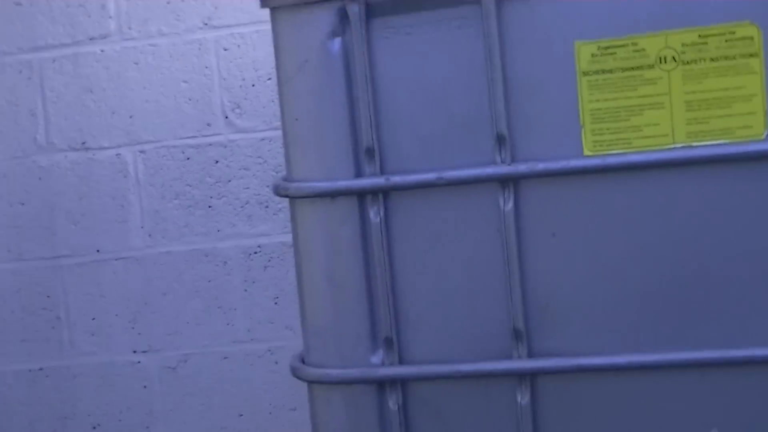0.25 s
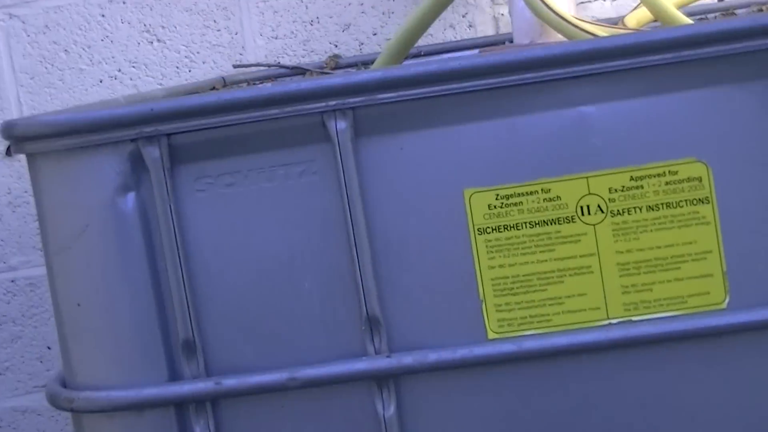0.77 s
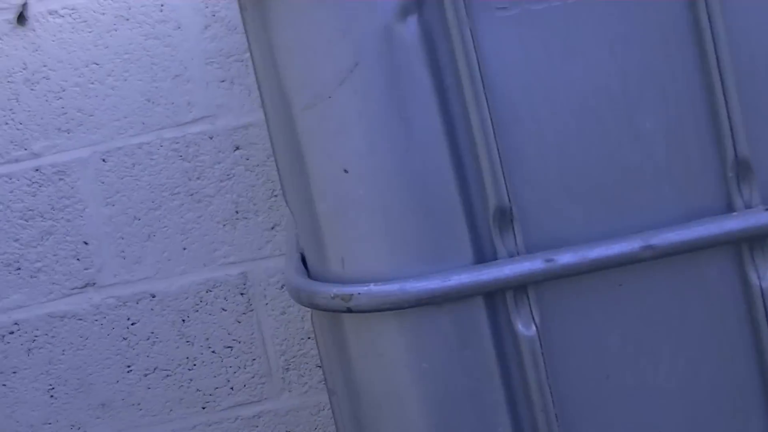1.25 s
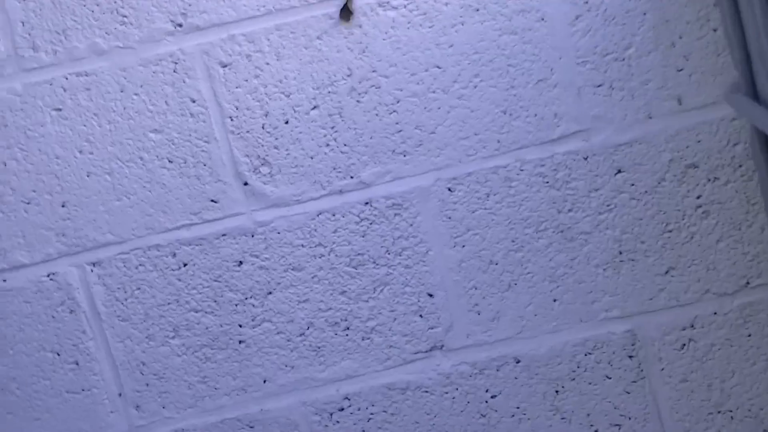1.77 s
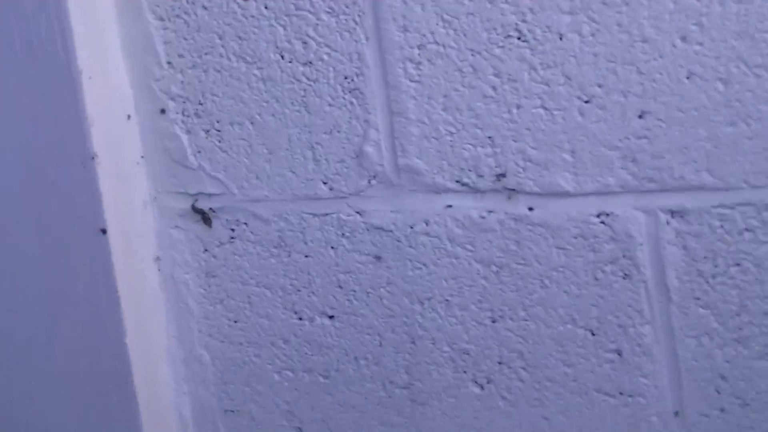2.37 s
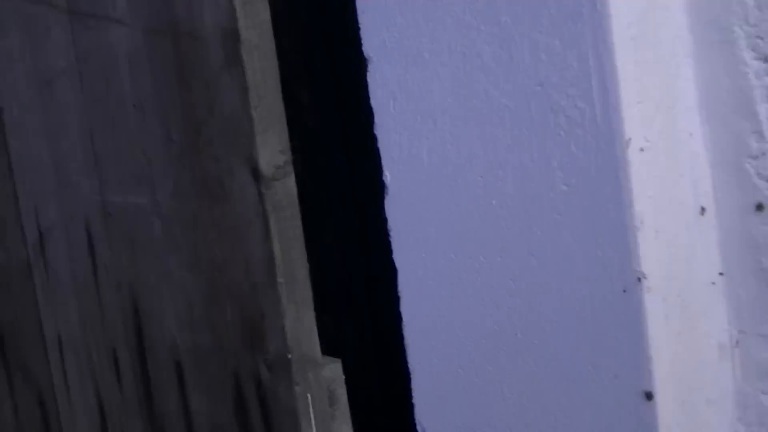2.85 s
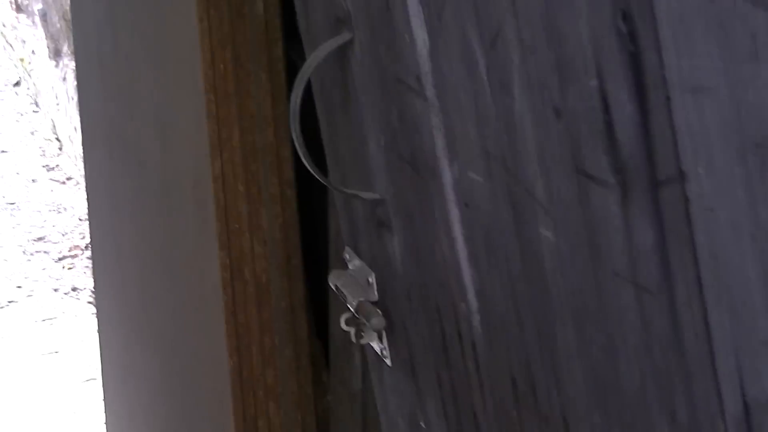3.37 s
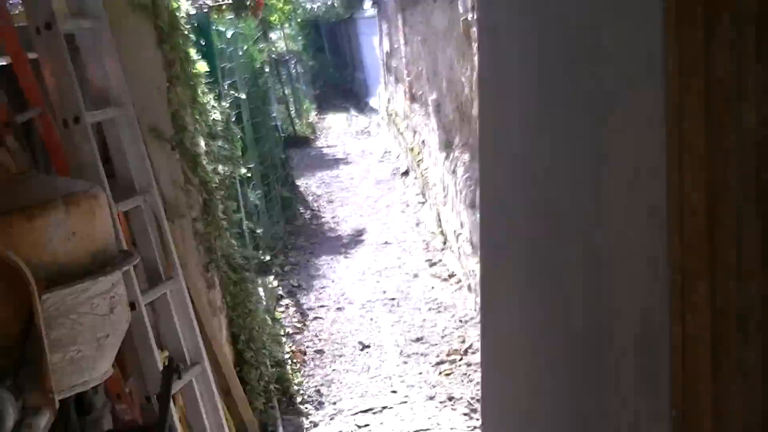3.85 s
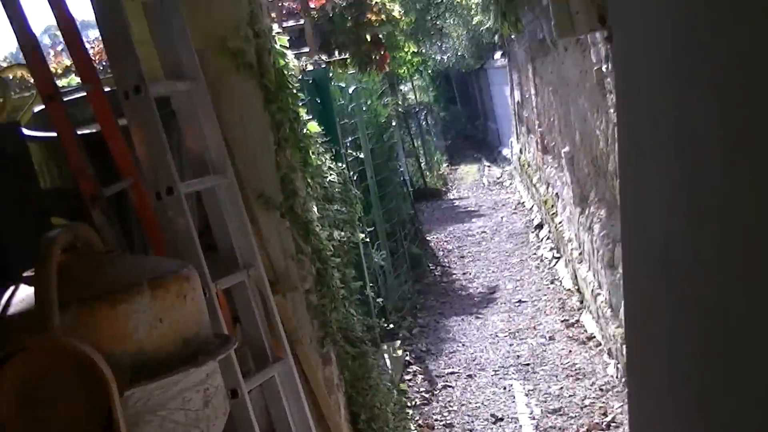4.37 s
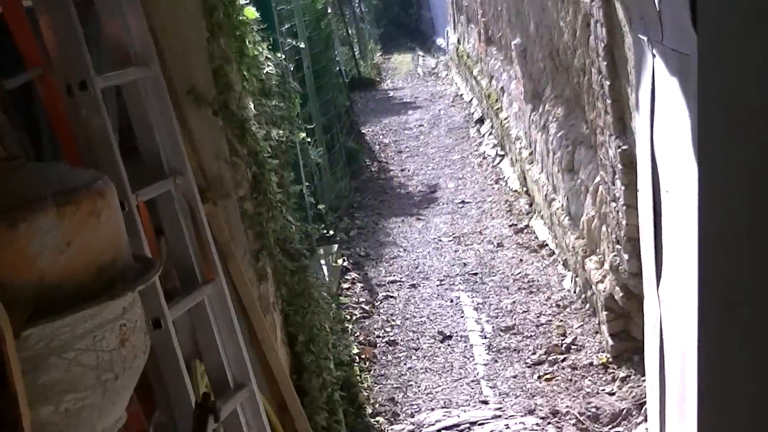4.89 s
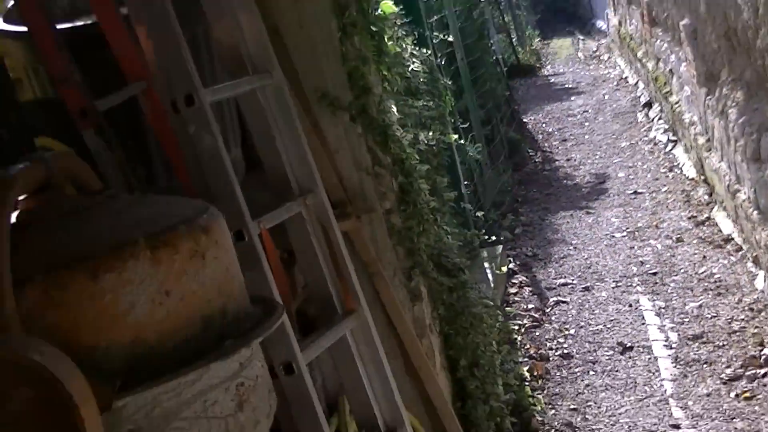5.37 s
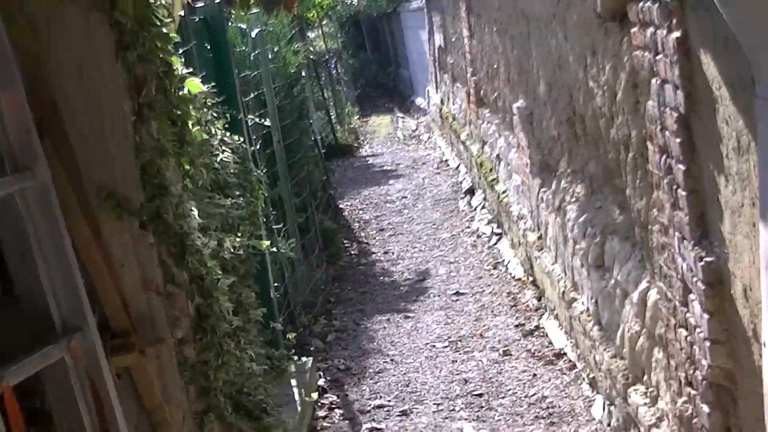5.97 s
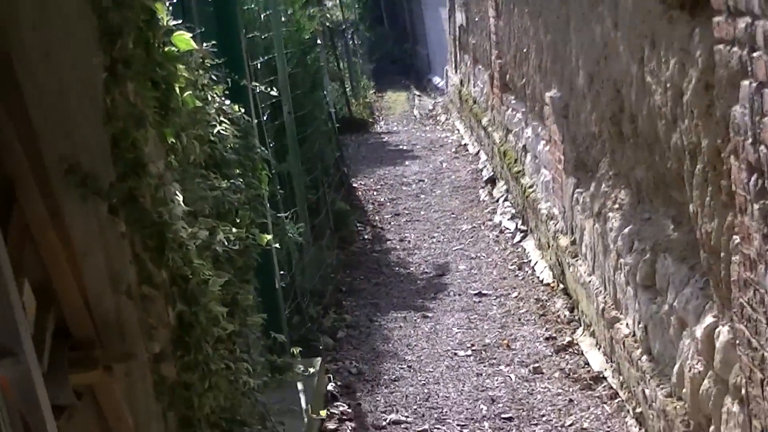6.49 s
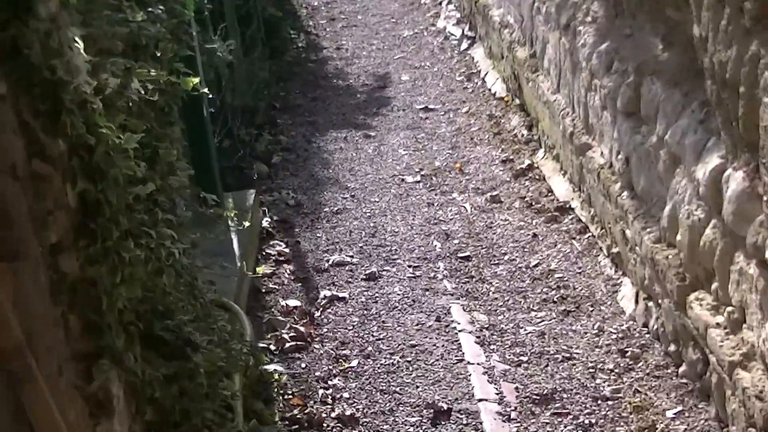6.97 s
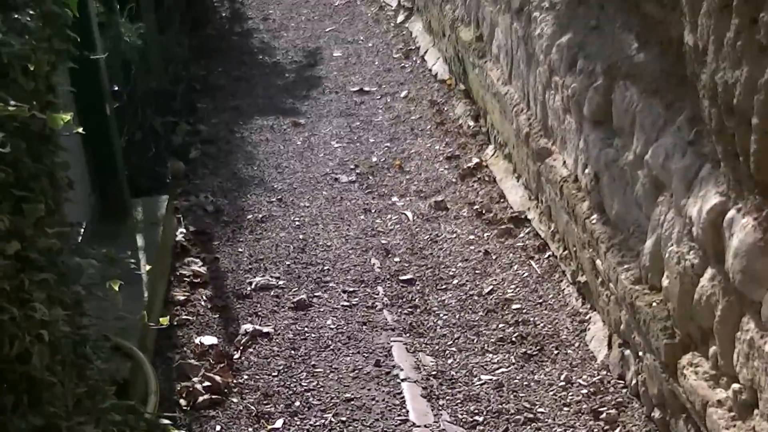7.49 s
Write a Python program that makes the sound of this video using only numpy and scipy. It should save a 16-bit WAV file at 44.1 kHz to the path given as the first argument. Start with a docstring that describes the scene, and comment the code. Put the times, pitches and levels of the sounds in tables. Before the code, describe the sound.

Soft, steady outdoor air with a very faint distant motor hum runs throughout, the hum gradually rising in pitch in the second half. At 0.1 s a step crunches on gravel, followed by light brushing scuffs until another modest, rolling step at 1.4 s. Dragging scuffs follow; bright stones snap at 2.3 s and tiny metal clinks tick around 2.4-2.7 s. A short, hard, heavy heel hit lands at 2.9 s with stones knocking. A rubbing scuff and faint clinks come near 3.4 s, then another strong, dull step at 3.9 s with a quick metallic chatter just after. At 5.0 s a longer gritty step rolls over low, hollow stones. Dull scuffs at 6.0 and 6.4 s and lighter taps lead to a crunchy step at 7.3 s with stone knocks. Grit trickles after every movement, with brief wall reflections.

```python
"""Outdoor air and a faint far motor hum, then slow footsteps on gravel in a narrow walled path, in stereo.
Each heel knocks and crunches, the ball taps and rolls, and the other foot scuffs: dense stone hits under a load.
Large stones knock as decaying notes, single stones snap as coloured clicks, and a small metal piece clinks
close by on short-lived modes. Loose grit is sparse noise, air is coloured noise, and the hum is two sines."""
import sys
import numpy as np
from scipy import signal
from scipy.fft import rfft, irfft, next_fast_len
from scipy.io import wavfile
from scipy.ndimage import uniform_filter1d

SR = 44100
rng = np.random.default_rng(int(sys.argv[2]) if len(sys.argv) > 2 else 0)


def inscribe(sig):
    """Save sig as 16-bit PCM at rate SR to the path in sys.argv[1].

    A 1-D sig is mono; a 2-D sig holds one channel per row.
    Samples are clipped to [-1, 1] before scaling.
    """
    pcm = np.round(np.clip(np.atleast_2d(sig).T, -1, 1) * 32767)
    wavfile.write(sys.argv[1], SR, pcm.astype(np.int16))


N = 341019

# Steady outdoor air, spectrum shape: frequency_hz, level_db
AIR_SPECTRUM = [(15, -77), (25, -22), (92, -13), (130, -16), (242, -9.5), (270, -6), (344, -6.5),
                (734, -5.5), (887, -4), (1400, -9.5), (1520, -6), (1740, -9.5), (2350, -12), (3520, -18),
                (12000, -27.5), (16000, -39)]
# Far motor, whose pitch dips and then climbs: time_s, pitch_hz, relative level_db
MOTOR_CURVE = [(0.0, 54, -53.5), (1.0, 55, -58), (2.5, 48, -70.5), (3.4, 52, -54.5), (4.65, 69, -50),
               (5.2, 80, -69), (5.8, 90, -59), (6.7, 99, -56), (7.73, 105, -52)]
# How well each motor order carries: frequency_hz, gain_db
MOTOR_CARRY_CURVE = [(50, -21), (65, -12.5), (90, 2.5), (118, -8.5), (135, -24), (210, -24)]
# Stereo pair, direct sound: frequency_hz, left_lead_rad
LEFT_LEAD = [(200, -6.5), (1100, 0.83), (2000, 0.1), (3200, -0.67), (5000, -4.5), (14000, 1)]
# Stereo pair, diffuse sound: frequency_hz, side_minus_mid_db
STEREO_WIDTH = [(30, 12), (70, 7.5), (160, -9.5), (700, -4.5), (1500, -1), (3000, 1.5), (6000, 1.5),
                (14000, 1)]
# Loose grit as it settles, spectrum shape: frequency_hz, level_db
SETTLING_SPECTRUM = [(800, 0.5), (2500, 7), (6000, -10.5), (11500, -2.5), (16000, -23)]
# Small metal piece clinks: start_s, relative level_db, pitch_hz, ring_gain_db
CLINK_EVENTS = [(2.4325, -36.5, 5400, -4), (2.565, -26, 5560, -11), (2.689, -36, 5450, -3),
                (3.3848, -34.5, 5600, 2.5), (3.393, -38.5, 5300, 2), (4.0547, -29, 6700, -3.5),
                (4.0644, -27, 5190, -2.5), (4.0967, -26.5, 4720, -8), (4.126, -32, 5150, -8),
                (4.428, -26.5, 6730, -19.5), (5.5095, -53, 6000, 1)]
# Modes of the metal: pitch_multiple, level_db, t60_s
METAL_MODES = [(.97, 7.5, 0.017), (1.02, -20, .008), (1.25, -16, 0.008), (1.57, -7, .01), (2.15, 0, 0.012),
               (2.45, -3, 0.0063)]
# Single stones snap: start_s, relative level_db
SNAP_EVENTS = [(0.859, -18.5), (0.874, -26), (2.2822, -14), (2.2901, -6), (2.2927, -7.5), (2.5935, -28),
               (2.621, -17.5), (2.6901, -16.5), (2.6958, -22), (3.022, -21.5), (3.815, -30.5), (3.858, -30),
               (4.0584, -17), (4.102, -20.5), (4.1582, -27.5), (4.242, -29), (6.851, -19), (7.42, -17)]
# Hard, sharp contact, spectrum shape: frequency_hz, level_db
SNAP_SPECTRUM = [(300, -75), (1000, -23.5), (2000, -11), (4000, -10), (6000, -7), (11500, -8.5),
                 (16000, -20.5)]
# Large stones tip under the shoe: start_s, relative level_db, pitch_hz
KNOCK_EVENTS = [(1.69, -31.5, 1260), (2.882, -27, 1070), (2.913, -25.5, 1050), (3.124, -33, 1230),
                (3.721, -31.5, 1900), (4.185, -33.5, 1230), (5.05, -22, 497), (5.091, -25.5, 600),
                (5.196, -24, 940), (5.354, -33, 1380), (5.98, -42, 1240), (6.41, -27.5, 1500),
                (7.42, -19.5, 1160), (7.61, -21, 1350)]
# Blunt pulse of a knock, spectrum shape: frequency_hz, level_db
KNOCK_SPECTRUM = [(30, -51), (110, 0.5), (330, 5), (1000, 16.5), (1700, 9), (3000, -7), (12000, -21)]
# Where thud, body, crunch and grit sit: frequency_hz
STROKE_BANDS_HZ = [450, 1300, 3500, 10000]
# Colour shared by all strokes on the gravel: frequency_hz, level_db
GRAVEL_SPECTRUM = [(20, -42), (50, -25), (110, -26), (200, -8), (450, 2), (800, -1.5), (1300, -1),
                   (2200, -1.2), (3500, -2.5), (6000, -1.5), (11800, 1.5), (14000, -5), (16000, -20)]
# Light touches or drags of the other foot: start_s, relative level_db, rise_s, thud_db, brightness_db
SCUFF_EVENTS = [(0.41, -45, 0.011, 1, -0.5), (0.557, -32, 0.0014, -9, -12),
                (0.852, -31.5, 0.0039, 1.5, 7.5), (0.949, -41.5, 0.0063, 5, 10.5),
                (1.074, -43, 0.021, 11.5, 6), (1.682, -34, 0.0033, 3, 4.5), (1.814, -31, 0.018, -3, -35),
                (1.964, -29.5, 0.027, 3.5, -7), (2.25, -33, 0.0044, 8, -2), (2.30, -44, 0.063, -23, 2),
                (2.449, -33.5, 0.011, -1, -7), (2.58, -26, 0.0084, -2.5, -13), (2.88, -24.5, 0.0033, 0, 0),
                (3.1, -37.5, 0.006, -23, -3), (3.456, -24.5, .038, -13, 9), (3.563, -36, 0.0017, 5.5, -3),
                (3.712, -31.5, 0.0096, -3, -11), (4.213, -44, 0.0016, -3, 7), (4.528, -37, 0.061, -9, 5),
                (4.721, -31.5, 0.026, -14, -16), (5.195, -22, 0.0019, 2, -14),
                (5.777, -40.5, 0.011, 5.5, 1.5), (5.84, -36.5, 0.014, -10, -5),
                (5.979, -21, 0.0037, -17, -19.5), (6.10, -26.5, 0.048, -7.5, -8.5),
                (6.408, -20, 0.015, -18, -27), (6.484, -36.5, 0.0025, -14, 1.5),
                (6.563, -30, 0.049, -16, -19), (6.848, -23.5, 0.0024, -10.5, 4.5),
                (6.97, -40.5, 0.035, -10, 1.5), (7.046, -28, 0.0015, 1.5, -26),
                (7.172, -26.5, 0.0026, -14, -15), (7.573, -27, 0.0022, -12, -4.5)]
# Full steps, heel then ball (levels relative): start_s, knock_db, knock_pitch_hz, heel_db, heel_t60_s,
# heel_brightness_db, ball_delay_s, ball_db, roll_s, ball_brightness_db, thud_db
STEP_EVENTS = [(0.115, -24, 1270, -20, 0.22, -11, 0.041, -22.5, 0.081, -1.5, -2),
               (1.434, -20, 730, -23, 0.25, -3.5, .026, -29.5, 0.093, 10.5, 4),
               (2.908, -17, 1090, -5, 0.053, -12.5, 0.0044, -31, 0, -3, -17),
               (3.926, -11, 980, -7.5, 0.14, -20, .014, -11, 0.0086, 0.5, -6),
               (4.976, -13, 1170, -19.5, 0.33, -1.5, 0.037, -21, 0.14, 5, -3.5),
               (7.343, -38, 1510, -13, 0.3, 1.5, .077, -15, 0.017, 3, -15.5)]

SIZE = 2 ** 14   # samples that one event lasts
AGE = np.arange(SIZE) / SR   # seconds since the event began
CLICK = 1. * (AGE == 0)   # a lone contact
WALLS_T60_S = 0.36
AIR_DB = -53.5   # rms of the mid signal, before the final filters
# every stroke stirs up loose grit, which then settles
STEP_STIRS_DB, SCUFF_STIRS_DB, SETTLE_T60_S = -45, -60.5, 0.59
HEEL_RISE_S, BALL_RISE_S, BALL_T60_S = .004, 0.017, 0.24
# the ball's short tap, its level set against the roll
TAP_DB, TAP_RISE_S, TAP_T60_S = -3, 0.0048, 0.041
# the load eases while the foot rolls, and comes in small lurches
ROLL_SAG_DB_PER_S, LURCH_DB, LURCH_S = 65, 2.0, .012
# a scuff dies away more slowly the further it lies below the reference level
SCUFF_T60_S, SCUFF_REFERENCE_DB, LINGER_S_PER_DB = 0.22, -36, 0.0757
# crunch and grit at zero brightness, and the share of the brightness that the crunch takes
CRUNCH_DB, GRIT_DB, STEP_CRUNCH_SHARE, SCUFF_CRUNCH_SHARE = 0.5, -10, 0.67, 0.35
HEEL_THUD_DB = 1.5   # extra thud of the heel over the ball


def from_db(db):
    """Decibels to gain."""
    return 10 ** (np.asarray(db) / 20)


def at_hz(points, hz):
    """Read a table on a log-frequency axis."""
    f, value = np.transpose(points)
    return np.interp(np.log(hz + 1), np.log(f), value)


def in_time(rows):
    """The columns of a curve at every sample."""
    s, *columns = np.transpose(rows)
    return [np.interp(np.arange(N) / SR, s, column) for column in columns]


def bins(size):
    """Frequencies of a real transform."""
    return np.arange(size // 2 + 1) * SR / size


def unit_energy(x):
    """Scale so that the squares sum to one."""
    return x / np.sqrt(np.sum(x ** 2) + 1e-20)


def colour(x, spectrum):
    """Causal (minimum-phase) filter with the given dB spectrum."""
    size = next_fast_len(x.shape[-1], True)
    log_gain = np.log(from_db(at_hz(spectrum, bins(size))))
    cepstrum = irfft(log_gain, size)
    # folding the cepstrum onto positive times makes the phase minimum
    cepstrum[1:] *= 2 * (np.arange(1, size) < size / 2)
    response = np.exp(rfft(cepstrum))
    return irfft(rfft(x, size) * response, size)[..., :x.shape[-1]]


def diffuse(size):
    """Stereo white noise from all sides: mid and side noise balanced by frequency."""
    padded = next_fast_len(size, True)
    width = from_db(at_hz(STEREO_WIDTH, bins(padded)))
    mid, side = rfft(rng.standard_normal((2, padded)))
    pair = np.array([mid + width * side, mid - width * side])
    return irfft(pair / np.sqrt(1 + width ** 2), padded)[:, :size]


def air():
    """Steady outdoor air: diffuse noise with a fixed colour."""
    noise = colour(diffuse(N), AIR_SPECTRUM)
    return from_db(AIR_DB) * noise / np.std(noise.mean(axis=0))


def motor(gain_db):
    """A faint hum of two orders, each louder or softer as its pitch moves through the carry curve."""
    hz, db = in_time(MOTOR_CURVE)
    phase = 2 * np.pi * np.cumsum(hz) / SR
    hum = 0
    for order in (1, 2):
        carry_db = at_hz(MOTOR_CARRY_CURVE, order * hz)
        hum = hum + from_db(db + gain_db + carry_db) * np.sin(order * phase)
    return np.sqrt(2) * hum


def linger(energy, t60):
    """Spread energy over an exponential decay, keeping its sum."""
    kept = from_db(-60 / (t60 * SR)) ** 2   # share of energy left after each sample
    return signal.lfilter([0, 1 - kept], [1, -kept], energy + 1e-18)


def passage(hits, scatter_db, scatter_t60, tail_db):
    """Direct sound, scatter off the ground and the ring of the walls.
    Every stone lies elsewhere, so the reflections add up to noise that follows the energy of the hits."""
    lead = at_hz(LEFT_LEAD, bins(SIZE)) / 2
    direct = irfft(rfft(hits) * np.exp(1j * np.array([lead, -lead])))
    direct_share = 1 / (1 + from_db(scatter_db) ** 2)
    scatter = (1 - direct_share) * linger(hits ** 2, scatter_t60)
    walls = from_db(tail_db) ** 2 * linger(hits ** 2, WALLS_T60_S)
    return np.sqrt(direct_share) * direct + np.sqrt(scatter + walls) * diffuse(SIZE)


def strike(sound, scatter_db, scatter_t60, tail_db):
    """One short sound, heard through the space."""
    return irfft(rfft(sound) * rfft(passage(CLICK, scatter_db, scatter_t60, tail_db)))


def add(out, s, sound):
    """Mix a sound in at its time and fade out its last 80 ms."""
    at = round(s * SR)
    fade = np.clip((AGE[-1] - AGE) / .08, 0, 1) ** 2
    out[:, at:at + SIZE] += (sound * fade)[:, :N - at]


def grains(size, per_s, spread_db):
    """Stones collide at random moments, with nearly equal force; rms 1."""
    excess = np.minimum(rng.exponential(1, size), 4)
    sizes = from_db(spread_db * excess) * rng.choice([-1, 1], size)
    collides = rng.random(size) < per_s / SR
    return unit_energy(sizes * collides) * np.sqrt(size)


def settling(uneven_db, uneven_s):
    """Loose grit keeps shifting after each step and scuff, unevenly and ever more faintly."""
    stirs = np.zeros(N)   # energy
    for rows, db in ((STEP_EVENTS, STEP_STIRS_DB), (SCUFF_EVENTS, SCUFF_STIRS_DB)):
        stirs[[round(row[0] * SR) for row in rows]] = from_db(db) ** 2
    kept = from_db(-60 / (SETTLE_T60_S * SR)) ** 2
    unrest = np.sqrt(signal.lfilter([1], [1, -kept], stirs))
    uneven = uniform_filter1d(rng.standard_normal(N), max(int(uneven_s * SR), 1))
    uneven_gain = from_db(uneven_db * uneven / np.std(uneven))
    grit = colour(diffuse(N) * np.abs(grains(N, per_s=3000, spread_db=0.5)), SETTLING_SPECTRUM)
    return unrest * uneven_gain * grit / np.std(grit)


def clinks(gain_db):
    """The metal chatters for a moment and rings briefly; the walls spread its note on."""
    out = np.zeros((2, N))
    contact = colour(CLICK, SNAP_SPECTRUM) * from_db(20.0)
    for s, db, hz, ring_db in CLINK_EVENTS:
        ring = 0
        for multiple, level, t60 in METAL_MODES:
            # each hit excites the modes a little differently
            envelope = from_db(level + rng.normal(0, 3.6) - 60 * AGE / t60)
            ring = ring + envelope * np.sin(2 * np.pi * hz * multiple * AGE)
        clink = strike(from_db(ring_db) * ring + contact, scatter_db=15, scatter_t60=0.06, tail_db=-9)
        add(out, s, from_db(db + gain_db) * clink)
    return out


def snaps(gain_db):
    """A stone slips and cracks against its neighbour: one bright pulse with its scatter."""
    out = np.zeros((2, N))
    pulse = unit_energy(colour(CLICK, SNAP_SPECTRUM))
    for s, db in SNAP_EVENTS:
        snap = strike(pulse, scatter_db=14, scatter_t60=0.025, tail_db=-11)
        add(out, s, from_db(db + gain_db) * snap)
    return out


def dull_note(hz, cycles):
    """The note of a struck stone, down 60 dB after the given number of cycles; unit energy."""
    return unit_energy(from_db(-60 * AGE * hz / cycles) * np.cos(2 * np.pi * hz * AGE))


def knock(db, hz, ring_db, cycles, scatter_db):
    """A blunt pulse and the brief hollow note of what was hit."""
    pulse = unit_energy(colour(CLICK, KNOCK_SPECTRUM))
    hit = pulse + from_db(ring_db) * dull_note(hz, cycles)
    return from_db(db + 9.0) * strike(hit, scatter_db, scatter_t60=0.011, tail_db=-4)


def knocks():
    """Large stones tip and knock as the weight moves over them."""
    out = np.zeros((2, N))
    for s, db, hz in KNOCK_EVENTS:
        add(out, s, knock(db, hz, ring_db=6.0, cycles=14, scatter_db=23))
    return out


def pebbles(load, per_s, cycles, low_hz, high_hz, count):
    """The larger stones knock now and then, each with a dull note of its own."""
    spectrum = 0
    for hz in low_hz * (high_hz / low_hz) ** rng.random(count):
        hits = load * grains(SIZE, per_s, spread_db=1.0)
        spectrum = spectrum + rfft(hits) * rfft(dull_note(hz, cycles))
    return irfft(spectrum) / np.sqrt(count)


def colouring(thud_db, bright_db, crunch_share):
    """Gains of thud, body, crunch and grit: loose fine gravel is bright, firm ground is dull."""
    return [thud_db, 0, CRUNCH_DB + crunch_share * bright_db, GRIT_DB + bright_db]


def stroke(db, rise, hold, t60, gains_db):
    """Weight comes onto the stones, they grind against each other while it rolls on, then they lock."""
    lurch = uniform_filter1d(rng.standard_normal(SIZE), max(int(LURCH_S * SR), 1))
    lurch_db = LURCH_DB * lurch / np.std(lurch)
    roll_sag_db = ROLL_SAG_DB_PER_S * np.clip(AGE - rise, 0, hold)
    decay_db = 60 * np.maximum(AGE - rise - hold, 0) / t60
    onset = np.minimum(AGE / max(rise, 1 / SR), 1)
    load = onset * from_db(lurch_db - roll_sag_db - decay_db)
    fine_hits = load * grains(SIZE, per_s=7000, spread_db=0.5)
    fine = passage(fine_hits, scatter_db=8.0, scatter_t60=0.0045, tail_db=-14.0)
    large_stones = pebbles(load, per_s=100, cycles=29.0, low_hz=503, high_hz=4050, count=4)
    coarse = strike(large_stones, scatter_db=-2.5, scatter_t60=0.1, tail_db=-14)
    tilt = list(zip(STROKE_BANDS_HZ, gains_db))
    spectrum = [(hz, level + at_hz(tilt, hz)) for hz, level in GRAVEL_SPECTRUM]
    return from_db(db - 1.85) * colour(fine + from_db(-11.5) * coarse, spectrum)


def scuffs():
    """The free foot brushes the gravel: one light stroke with no roll."""
    out = np.zeros((2, N))
    for s, db, rise, thud_db, bright_db in SCUFF_EVENTS:
        t60 = SCUFF_T60_S + LINGER_S_PER_DB * max(SCUFF_REFERENCE_DB - db, 0)
        gains_db = colouring(thud_db, bright_db, SCUFF_CRUNCH_SHARE)
        add(out, s, stroke(db, rise, 0, t60, gains_db))
    return out


def footsteps():
    """The heel knocks and crunches, then the ball of the foot taps down and rolls through the gravel."""
    out = np.zeros((2, N))
    for (s, knock_db, hz, heel_db, heel_t60, heel_bright_db,
         ball_delay, ball_db, roll, ball_bright_db, thud_db) in STEP_EVENTS:
        heel = colouring(thud_db + HEEL_THUD_DB, heel_bright_db, STEP_CRUNCH_SHARE)
        ball = colouring(thud_db, ball_bright_db, STEP_CRUNCH_SHARE)
        ball_s = s + ball_delay
        add(out, s, stroke(heel_db, HEEL_RISE_S, 0, heel_t60, heel))
        add(out, s + HEEL_RISE_S / 2, knock(knock_db, hz, ring_db=2, cycles=18, scatter_db=6))
        add(out, ball_s, stroke(ball_db + TAP_DB, TAP_RISE_S, 0, TAP_T60_S, ball))
        add(out, ball_s, stroke(ball_db, BALL_RISE_S, roll, BALL_T60_S, ball))
    return out


def scene():
    """Feet, stones and metal over the air and the motor."""
    background = air() + motor(gain_db=-14.5)
    stones = settling(uneven_db=7.5, uneven_s=.03) + snaps(gain_db=9.0) + knocks()
    feet = scuffs() + footsteps()
    return background + clinks(gain_db=5.0) + stones + feet


def record(dry):
    """The deep bass is rolled off below 32 Hz and the top is cut steeply at 16 kHz."""
    low_cut = signal.butter(2, 32, "high", fs=SR, output="sos")
    high_cut = signal.ellip(10, .1, 80, 16000, fs=SR, output="sos")
    return signal.sosfilt(high_cut, signal.sosfilt(low_cut, dry))


dry = scene()
out = record(dry)
inscribe(out)
```